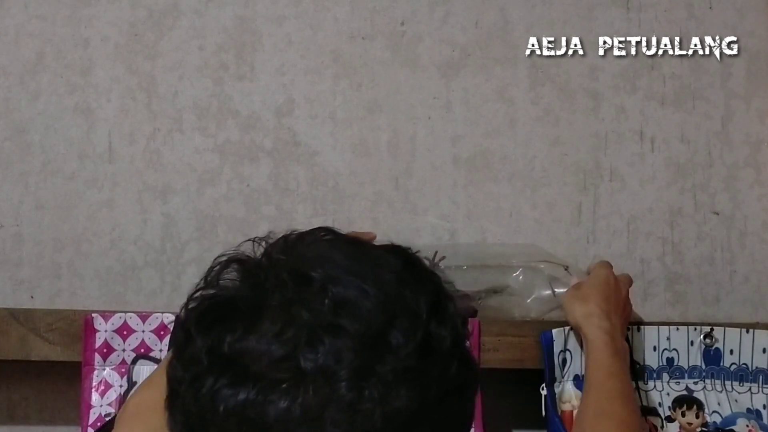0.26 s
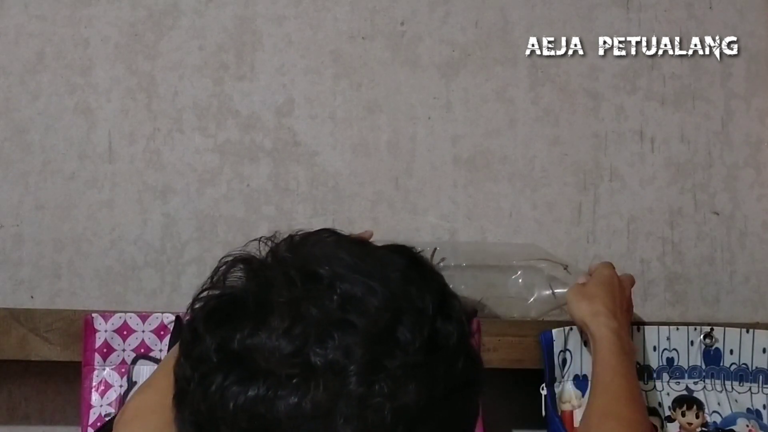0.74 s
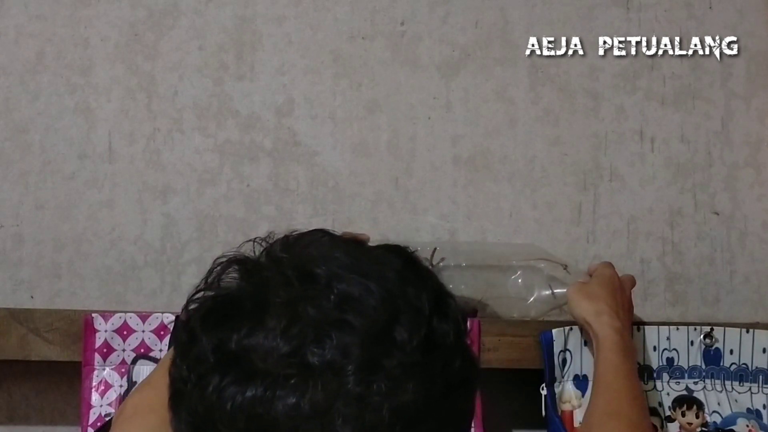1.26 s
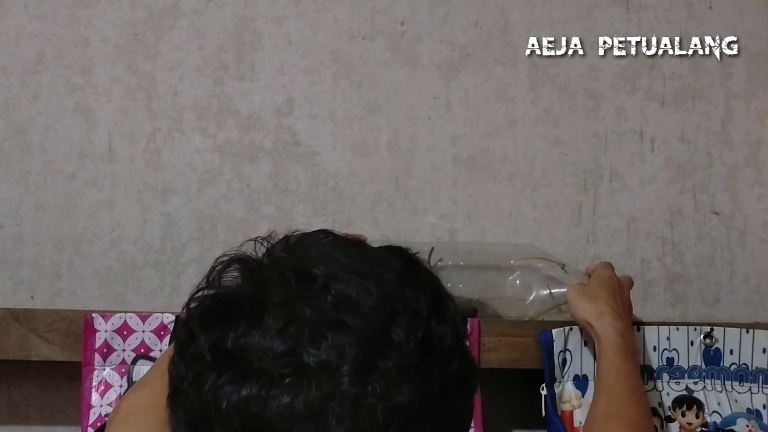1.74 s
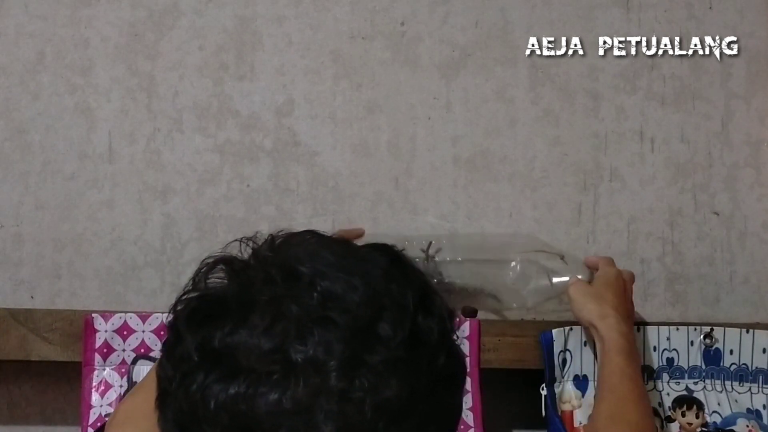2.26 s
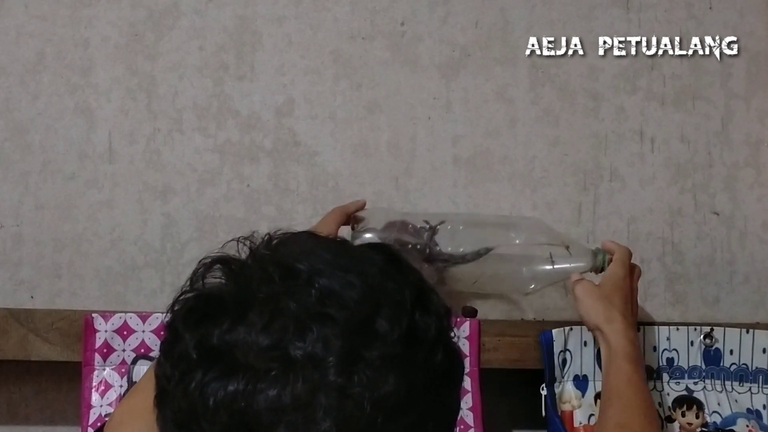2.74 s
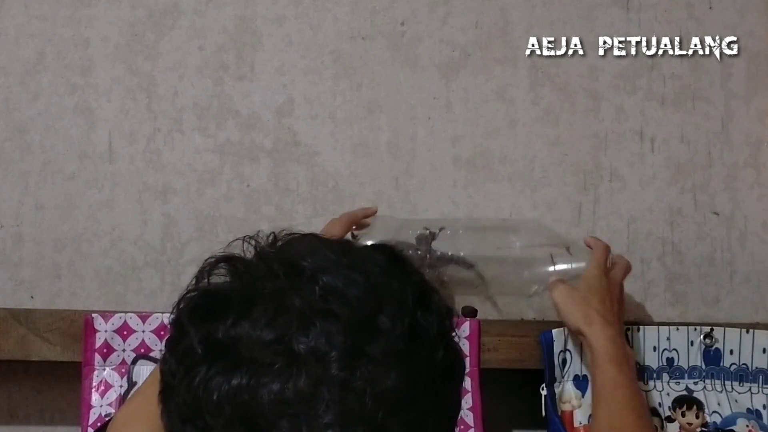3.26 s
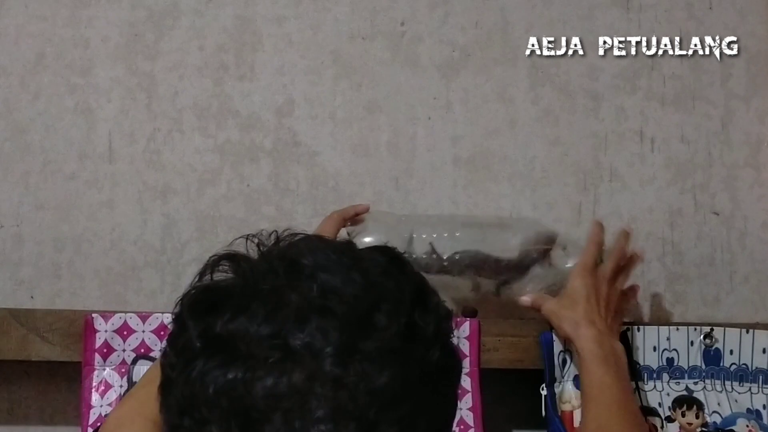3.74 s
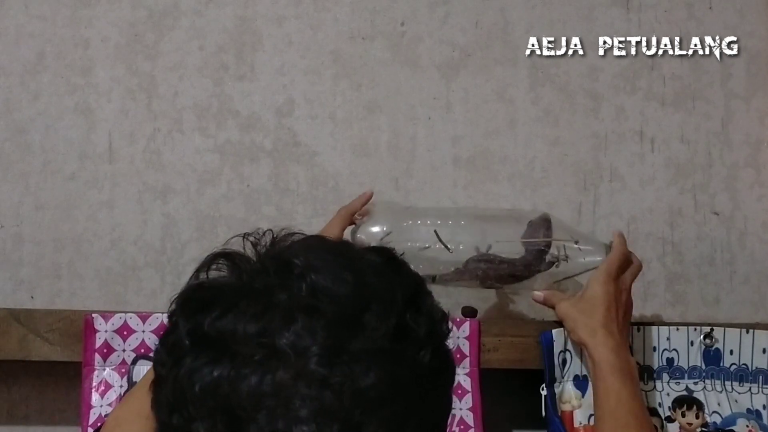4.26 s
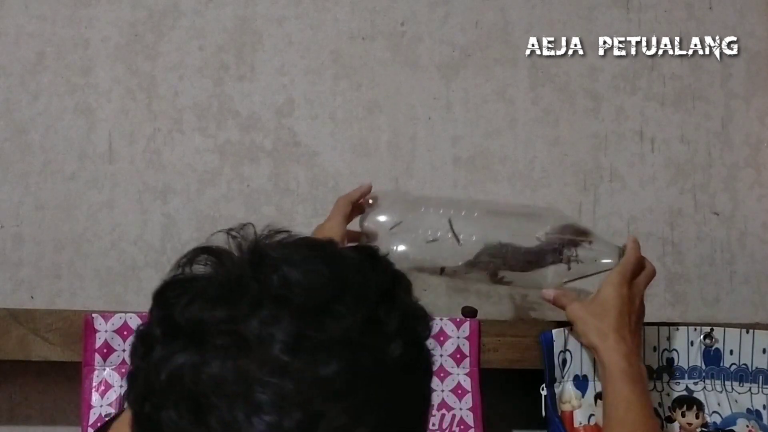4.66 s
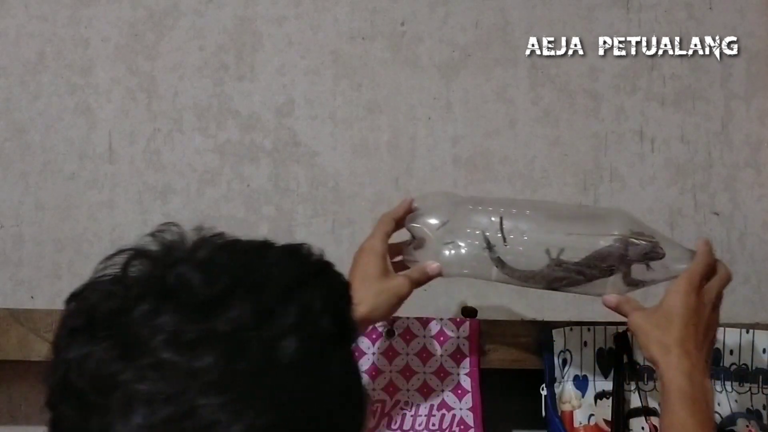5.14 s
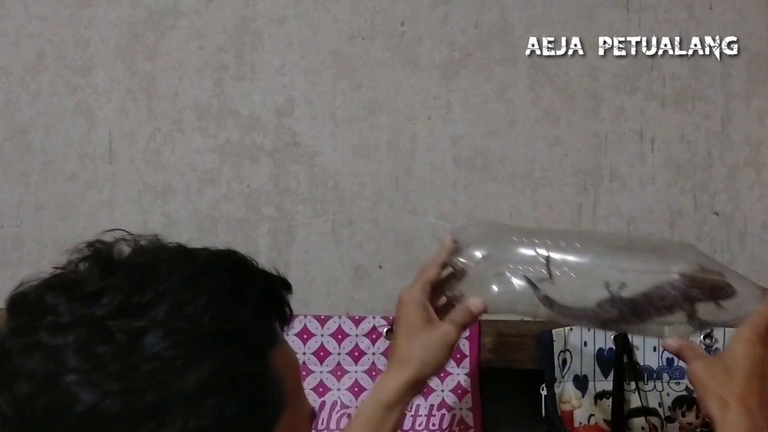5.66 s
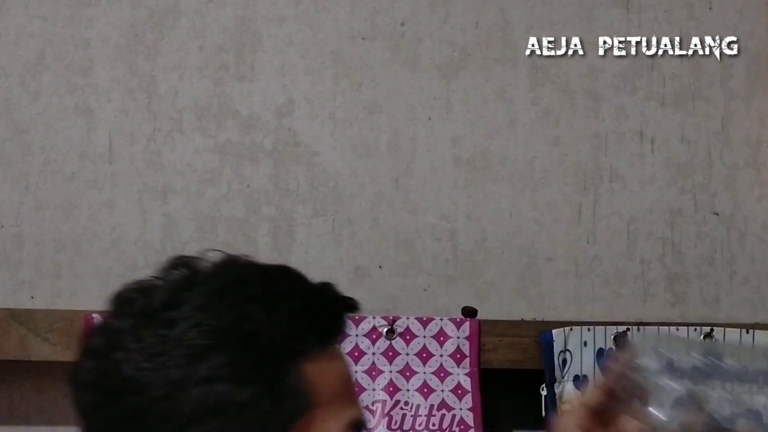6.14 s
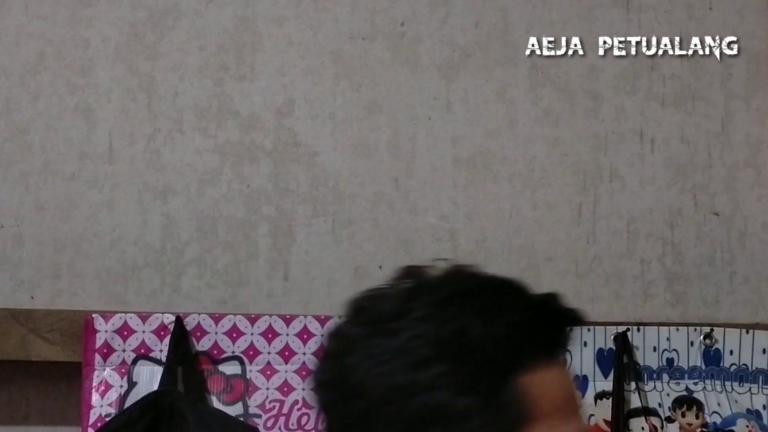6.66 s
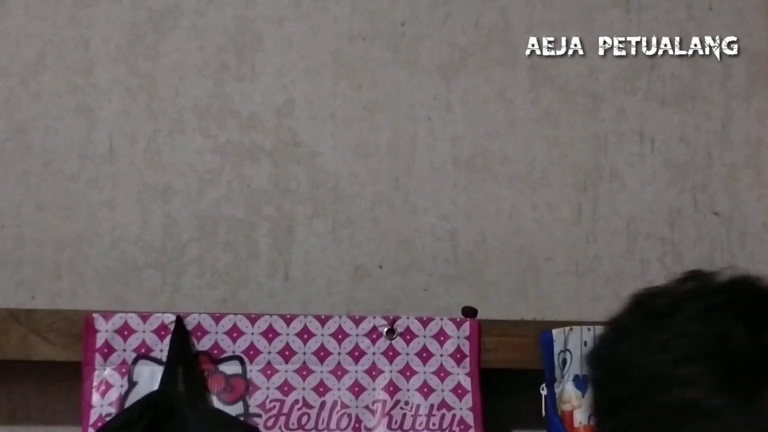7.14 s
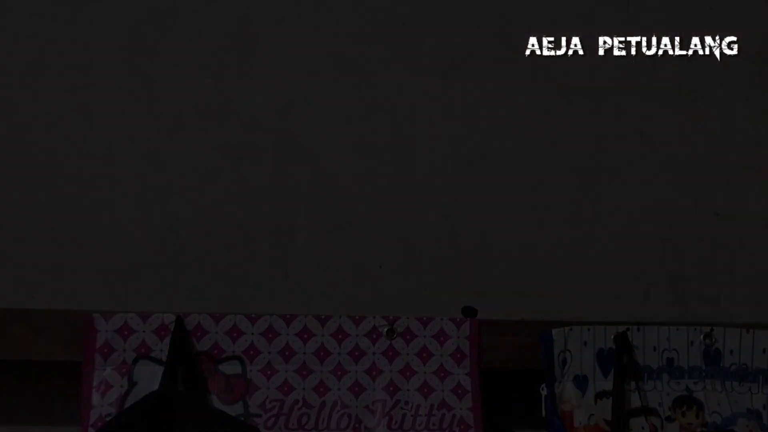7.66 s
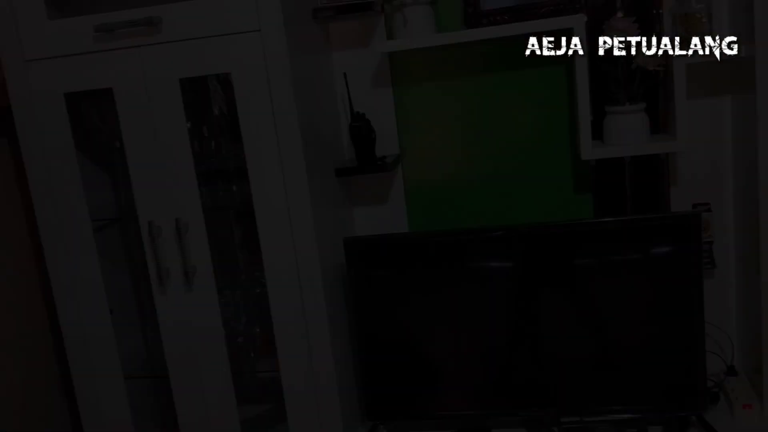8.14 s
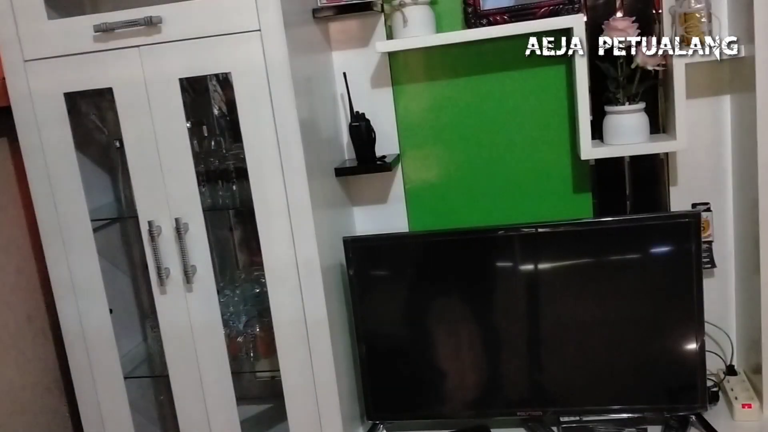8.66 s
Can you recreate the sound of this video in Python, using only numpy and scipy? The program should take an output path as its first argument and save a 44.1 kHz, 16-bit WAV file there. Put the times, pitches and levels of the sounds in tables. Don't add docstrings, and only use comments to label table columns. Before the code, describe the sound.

A small, bare, hard-walled room, microphone a metre or two from a thin hollow plastic bottle. From 0 to 0.8 s it is squeezed, light ticks growing into a tight run of loud snaps and pops strongest around 0.5-0.65 s. From 0.8 to 2 s there is near quiet, with a few tiny creaks over low rumble and room air. From 2.1 to 3.3 s lighter, scattered crackles come as it is lifted. From 3.4 to 4.1 s a regrip brings dense, sharp crunching and scrabbling, with a dull knock near 3.9 s. Another squeeze from 4.4 peaks around 4.85 with a soft thud, then calms. From 5.9 to 7 s faint creaks, taps and a high cloth swish follow. A barely audible insect shrills steadily. Sound fades from 7.4 to silence near 8.15 s, then quiet air and tiny creaks fade in.

```python
import sys
import numpy as np
from scipy import signal
from scipy.fft import rfft, irfft
from scipy.io import wavfile

SR = 44100
rng = np.random.default_rng(int(sys.argv[2]) if len(sys.argv) > 2 else 0)


def convert_level_to_amplitude(level_db):
    exponent = np.asarray(level_db, float) / 20
    return 10 ** exponent


def pcm_store(signal):
    levels = np.round(np.clip(np.atleast_2d(signal), -1, 1) * 32767)
    wavfile.write(sys.argv[1], SR, levels.astype(np.int16).T)


N = 392490


def rms_one(x):
    return x / np.sqrt(np.mean(x ** 2) + 1e-20)


def energy_one(x):
    return x / np.sqrt(np.sum(x ** 2))


def in_time(rows):
    s, *columns = np.transpose(rows)
    return [np.interp(np.arange(N) / SR, s, column) for column in columns]


def at_hz(points, hz):
    table_hz, table_value = np.array(points).T[:2]
    return np.interp(np.log(hz), np.log(table_hz), table_value)


def band(x, low_hz, high_hz):
    edges_hz = [low_hz, min(high_hz, 0.45 * SR)]
    return signal.sosfilt(signal.butter(2, edges_hz, "band", fs=SR, output="sos"), x)


def resonance(x, hz, width_hz):
    r = np.exp(-np.pi * width_hz / SR)
    feedback = [1, -2 * r * np.cos(2 * np.pi * hz / SR), r * r]
    return signal.lfilter(np.array([1, 0, -1]) * (1 - r * r) / 2, feedback, x)


def lift(x, hz, width_hz, lift_db):
    return x + (convert_level_to_amplitude(lift_db) - 1) * resonance(x, hz, width_hz)


def drift(rate):
    knots = rng.standard_normal(200)
    return np.interp(np.arange(N) / SR * rate, np.arange(len(knots)), knots)


def coloured_noise(spectrum):
    hz = np.fft.rfftfreq(N, 1 / SR) + 1
    return rms_one(irfft(rfft(rng.standard_normal(N)) * convert_level_to_amplitude(at_hz(spectrum, hz)), N))


# start_s [s], peak_db [dB], sharpness_db [dB], pitch_hz [Hz]
FIRST_SQUEEZE = [(0.001, -37, -14, 1380), (0.057, -34.5, -45, 875), (0.114, -37, -32, 1050),
                 (0.178, -35.5, -33, 517), (0.227, -36, -25, 864), (0.298, -37.5, -25.5, 974),
                 (0.322, -24.5, -10, 961), (0.342, -53, -8.5, 888), (0.393, -25, -14.5, 982),
                 (0.421, -25, -16.5, 942), (0.484, -19.5, -17.5, 980), (0.52, -14.5, -18.5, 2190),
                 (0.546, -18, -9.5, 859), (0.566, -24, -30, 937), (0.604, -15.5, -18, 460),
                 (0.623, -23.5, -30.5, 530), (0.658, -21.5, -19.5, 541), (0.779, -40.5, -18, 474)]
# start_s [s], peak_db [dB], sharpness_db [dB], pitch_hz [Hz]
LIFTING = [(2.075, -46.5, -37, 468), (2.134, -44, -48, 485), (2.161, -40, -16.5, 1260),
           (2.254, -34, -27, 520), (2.327, -53, -3, 1010), (2.344, -38, -17, 1060), (2.381, -37, -34, 958),
           (2.401, -33.5, -28, 1080), (2.44, -44, -9, 1050), (2.466, -53, -27, 1200),
           (2.492, -28, -12.5, 990), (2.566, -32, -26, 2260), (2.593, -43.5, -8, 991),
           (2.668, -37, -26, 1010), (2.69, -33, -25, 920), (2.736, -30, -18, 980), (2.838, -36, -18, 501),
           (2.855, -26.5, -16.5, 991), (2.878, -34, -14, 925), (2.97, -40.5, -29, 985),
           (3.025, -43.5, -10, 1050), (3.121, -25, -18.5, 940), (3.315, -30, -22, 1060),
           (3.326, -41.5, 0.5, 1090)]
# start_s [s], peak_db [dB], sharpness_db [dB], pitch_hz [Hz]
SCRAMBLE = [(3.428, -24, -20.5, 804), (3.461, -16, -12.5, 1420), (3.488, -26.5, -19.5, 1560),
            (3.551, -22.5, -11.5, 695), (3.565, -15.5, -12.5, 1060), (3.597, -27.5, -27, 2340),
            (3.64, -44.5, 11.5, 1250), (3.679, -40.5, -2, 2840), (3.738, -24.5, -22, 1110),
            (3.786, -24.5, -9, 515), (3.835, -20, -22, 696), (3.858, -22, -27, 1500),
            (3.874, -23.5, -19, 1040), (3.888, -26.5, -25, 1180), (3.907, -16.5, -21.5, 696),
            (3.928, -35.5, 3.5, 696), (3.958, -25, -10.5, 1560), (3.995, -24.5, -14, 1100),
            (4.021, -28.5, -40.5, 776), (4.153, -36.5, -7, 2640), (4.282, -33, -24.5, 730),
            (4.308, -75, 10, 770)]
# start_s [s], peak_db [dB], sharpness_db [dB], pitch_hz [Hz]
LAST_SQUEEZE = [(4.441, -26, -5, 940), (4.538, -22, -13.5, 730), (4.558, -22.5, -18.5, 660),
                (4.68, -44, -17, 576), (4.736, -40.5, -10, 970), (4.772, -21, -9.5, 517),
                (4.833, -26, -14.5, 490), (4.842, -15.5, -13.5, 903), (4.863, -27, -18, 1100),
                (4.896, -20.5, -9.5, 558), (4.913, -32, -17, 1070), (4.938, -34.5, -18.5, 1090),
                (5.173, -52.5, -16, 1010), (5.216, -53, -18, 1030), (5.353, -54, -12, 1020)]
# start_s [s], peak_db [dB], sharpness_db [dB], pitch_hz [Hz]
CARRIED_OFF = [(5.931, -51.5, -2.5, 544), (5.974, -47.5, -3.5, 527), (6.044, -51, -15, 530),
               (6.095, -49.5, -12, 513), (6.193, -41.5, -16.5, 645), (6.239, -46, -22, 535),
               (6.291, -43, -16, 595), (6.303, -46.5, -9, 1010), (6.399, -39.5, -20.5, 1025),
               (6.537, -36, -70, 576), (6.626, -50, 8.5, 655), (6.657, -42, -15, 1100),
               (6.734, -52.5, -13, 1130), (6.85, -74, 22, 980), (6.874, -82, -4, 1000)]
# start_s [s], peak_db [dB], sharpness_db [dB], pitch_hz [Hz]
STRAY_CREAKS = [(0.988, -51, -22, 450), (1.073, -51, -26, 544), (1.172, -47, -51, 2300),
                (1.383, -59, -27, 1510), (1.443, -53, -38, 580), (1.629, -68, 1, 1280),
                (1.814, -51.5, -28, 1860), (7.142, -66, -1, 1160), (7.211, -54, -19, 980),
                (7.658, -55, -7.5, 618), (7.711, -50, -16, 611), (7.743, -50, -10, 592),
                (7.813, -58, -5, 1040), (7.963, -52, -22.5, 985), (8.447, -52.5, -21.5, 523),
                (8.473, -57, -20.5, 777), (8.705, -54, -18, 477), (8.742, -48, -33, 2300),
                (8.804, -55, -25, 550), (8.847, -56, -22, 565)]
SPELLS = [FIRST_SQUEEZE, LIFTING, SCRAMBLE, LAST_SQUEEZE, CARRIED_OFF, STRAY_CREAKS]
# boom_db [dB], panel_db [dB], nearness_db [dB]
HOLD = [
    (-3, -2, -1),
    (-5, -1, -0.5),
    (-2, 0.15, 0),
    (0, 0.5, 0),
    (1.5, 1.3, 1),
    (-1, 3.9, -2),
]


def snaps(buckle_s, near_db, dent_q, dent_db):
    ragged_share = 0.8
    crack_s, crack_near_db = 0.004, 3.5
    full_ring_hz = 900
    flips = [flip + hold for spell, hold in zip(SPELLS, HOLD) for flip in spell]
    size = 2048
    t = np.arange(size) / SR
    out = np.zeros((2, N + size))
    grains = rng.standard_normal((len(flips), size))
    spiky = grains * np.abs(rng.standard_normal((len(flips), size)))
    bursts = spiky * (t / buckle_s + 0.11) * np.exp(-t / buckle_s)
    crack_shape = np.exp(-t / crack_s) * convert_level_to_amplitude([[0], [crack_near_db]])

    for (s, peak_db, sharp_db, hz, boom_db, panel_db, closer_db), burst in zip(flips, bursts):
        to_room = energy_one((t == 0) + ragged_share * energy_one(burst * spiky[0]))
        direct = convert_level_to_amplitude(near_db + closer_db) * energy_one(burst)
        jolt = np.array([to_room, direct])
        octaves = np.log2(hz / 1000)
        boom_db = boom_db - 2.5 * max(octaves, 0)
        panel_db = panel_db + 0.3 * sharp_db + 2.5 * octaves
        wall = lift(convert_level_to_amplitude(18.0) * band(jolt, 340, 1400), 480, 330, boom_db)
        wall = wall - convert_level_to_amplitude(panel_db + 18.5) * band(jolt, 1687, 4200)
        wall = lift(wall, hz, hz / dent_q, dent_db * min(hz / full_ring_hz, 1))
        wall = wall + convert_level_to_amplitude(sharp_db + 21) * band(jolt * crack_shape, 5300, 18000)
        at = round(s * SR)
        out[:, at:at + size] += convert_level_to_amplitude(peak_db) * wall
    return out[:, :N]


# start_s [s], level_db [dB]
GRIP = [
    [(0.0, -45.5), (0.25, -68), (0.372, -58), (0.5, -40), (0.584, -44.5), (0.826, -54.5), (1.0, -84)],
    [(2.05, -87), (2.146, -57), (2.294, -50), (2.398, -45), (2.58, -51), (3.166, -61), (3.4, -52)],
    [(3.4, -49.5), (3.446, -52), (3.574, -36.5), (3.71, -27.5), (3.88, -40.5), (4.254, -58.5), (4.4, -66.5)],
    [(4.45, -38), (4.48, -66.5), (4.656, -63), (4.89, -34), (4.946, -37), (5.068, -54.5), (5.25, -66)],
    [(5.85, -74), (5.966, -56), (6.124, -58), (6.474, -54.5), (6.588, -60), (6.752, -67), (6.95, -72)],
]


def rustle(per_s, spread_db):
    sizes = convert_level_to_amplitude(spread_db * np.minimum(rng.exponential(1, N), 4)) * rng.choice([-1, 1], N)
    creases = sizes * (rng.random(N) < per_s / SR) + 1e-18
    dull = rms_one(lift(band(creases, 450, 3800), 1000, 500, 3.6))
    bright = rms_one(band(creases, 2600, 17000))
    now, out = np.arange(N) / SR, np.zeros(N)
    for spell in GRIP:
        grip_db, = in_time(spell)
        held = (now > spell[0][0]) & (now < spell[-1][0])
        out += held * (convert_level_to_amplitude(grip_db - 20) * dull + convert_level_to_amplitude(0.75 * grip_db - 42.5) * bright)
    return out


# pitch_hz [Hz], width_hz [Hz], lift_db [dB]
BOTTLE_RESONANCES = [(477, 30, 9.5), (489, 40, 2), (666, 180, 5), (980, 29, 4.5), (1060, 400, 4.5),
                     (1530, 210, 3.5), (2290, 730, 5)]


def bottle(x):
    for hz, width_hz, lift_db in BOTTLE_RESONANCES:
        x = lift(x, hz, width_hz, lift_db)
    return band(x, 220, 19000)


# start_s [s], level_db [dB], pitch_hz [Hz], width_hz [Hz]
TAPS = [(.005, -21.5, 2900, 2460), (0.324, 1.5, 418, 80), (2.35, -15, 2450, 500), (2.45, -16, 2470, 500),
        (3.025, -18.5, 5270, 900), (1.175, -27, 2300, 400), (4.16, -31, 2550, 200), (5.96, -23, 2730, 250),
        (6.05, -21, 2680, 250), (6.11, -23, 2390, 250), (6.537, -9, 660, 690), (6.625, -31, 8500, 5000),
        (6.85, -31, 11000, 6000), (7.66, -21.5, 592, 51.4), (7.74, -25, 611, 61.4), (8.012, -27, 2910, 400),
        (8.742, -18, 2520, 696), (8.8, -34, 570, 40)]


def pings(near_db):
    out, tap = np.zeros(N), np.arange(4096) == 0
    for s, level_db, hz, width_hz in TAPS:
        ring = resonance(resonance(tap, hz, width_hz), hz, 2 * width_hz)
        out[round(s * SR):][:4096] += convert_level_to_amplitude(level_db - 20.5) * energy_one(ring)
    return out * convert_level_to_amplitude([[0], [near_db]])


# start_s [s], level_db [dB]
KNOCKS = [(0.448, -55.5), (2.683, -55.5), (3.86, -48.5), (4.841, -44), (6.2, -69), (6.399, -57),
          (6.539, -55.5)]


def thuds():
    push = np.zeros(N) + 1e-18
    for s, level_db in KNOCKS:
        push[round(s * SR)] = convert_level_to_amplitude(level_db + 42)
    return band(push, 130, 520)


def cloth():
    from_s, to_s, edge_s, level_db = 5.85, 7.43, 0.2, -75.5
    now = np.arange(N) / SR
    spell = np.clip(np.minimum(now - from_s, to_s - now) / edge_s, 0, 1)
    swish = rms_one(band(rng.standard_normal(N), 8400, 20000))
    return spell * convert_level_to_amplitude(level_db + 2.0 * drift(11)) * swish


# pitch_hz [Hz], fall_s [s]
ROOM_FALL = [(300, 0.39), (1000, 0.43), (3500, 0.4), (10000, 0.32)]
# pitch_hz [Hz], level_db [dB], fall_s [s]
AIR_MODES = [(472, -32, 0.17), (521.7, -16.5, 0.47), (604.6, -35, 0.97), (700.6, -19, 0.42),
             (985, -24, 0.2), (1076, -25.5, 0.33), (1560, -32.5, 0.8)]


def room(x):
    grain_s, grain_db = 0.033, 4.0
    size = SR // 2
    t = np.arange(size) / SR
    edges_hz = 140 * 2 ** np.arange(0, 7.5, 0.5)
    white = rng.standard_normal((2, size))
    white = white * convert_level_to_amplitude(grain_db * np.exp(-t / grain_s) * (rng.exponential(1, size) - 1))
    tail = np.zeros(size)
    for k, (low, high) in enumerate(zip(edges_hz, edges_hz[1:])):
        fall_s = at_hz(ROOM_FALL, np.sqrt(low * high))
        tail += band(white[k % 2], low, high) * convert_level_to_amplitude(-60 * t / fall_s)
    for hz, mode_db, fall_s in AIR_MODES:
        tail += convert_level_to_amplitude(mode_db - 60 * t / fall_s) * np.sin(2 * np.pi * hz * t)
    answer = convert_level_to_amplitude(-22) * tail * (1 - np.exp(-t / 0.0037))
    return signal.fftconvolve(x, answer)[:N]


# start_s [s], level_db [dB]
STIR = [(0, 7.5), (.45, 6), (.7, 10), (1.1, -2), (1.45, -2), (2.0, -5), (2.7, 4.5), (3.2, 4), (4.0, 5.5),
        (5.0, 4.5), (5.7, -3), (6.2, 5), (6.6, 7), (7.4, -1.5), (8.3, -3.5), (8.9, 0.5)]
# pitch_hz [Hz], level_db [dB per Hz]
RUMBLE_COLOUR = [(7.1, -34.5), (12, 6), (38, -12), (63, -15), (118, -21), (145, -14.5), (250, -32.5),
                 (320, -48), (550, -120)]
# pitch_hz [Hz], level_db [dB per Hz]
AIR_COLOUR = [(120, -36), (200, -1), (380, -4.5), (465, -3), (671, -7), (1270, -6.5), (4860, -19.5),
              (5330, -27), (14900, -23), (16000, -16)]
# pitch_hz [Hz], width_hz [Hz], level_db [dB]
INSECT = (4850, 250, -90)


def background():
    stir_db, = in_time(STIR)
    rumble = convert_level_to_amplitude(-59.5 + stir_db + 2.0 * drift(7.1)) * coloured_noise(RUMBLE_COLOUR)
    air = convert_level_to_amplitude(-66 + 0.48 * stir_db) * coloured_noise(AIR_COLOUR)
    hz, width_hz, insect_db = INSECT
    insect = convert_level_to_amplitude(insect_db) * rms_one(resonance(rng.standard_normal(N), hz, width_hz))
    return rumble + air + insect


def scene():
    flips = convert_level_to_amplitude(-6.0) * snaps(buckle_s=0.0037, near_db=8.5, dent_q=13.0, dent_db=9.5)
    handling = bottle(flips + rustle(per_s=430, spread_db=5.0))
    to_room, direct = handling + pings(near_db=4.5) + thuds()
    return (direct + room(to_room) + background() + cloth())[None]


def fade():
    silent_from_s, silent_to_s, fade_s = 8.125, 8.205, 0.72
    now = np.arange(N) / SR
    return np.clip(np.maximum(silent_from_s - now, now - silent_to_s) / fade_s, 0, 1)


def band_limit(x):
    return signal.sosfilt(signal.butter(12, 16840, fs=SR, output="sos"), x)


# pitch_hz [Hz], width_hz [Hz], lift_db [dB]
MIC_PEAK = (8200, 1100, 8.44)


def record(dry):
    faded = lift(dry, *MIC_PEAK) * fade()
    top_cut = signal.ellip(10, 0.5, 45, 15680, fs=SR, output="sos")
    return band_limit(signal.sosfilt(top_cut, faded))


dry = scene()
out = record(dry)
pcm_store(out)
```